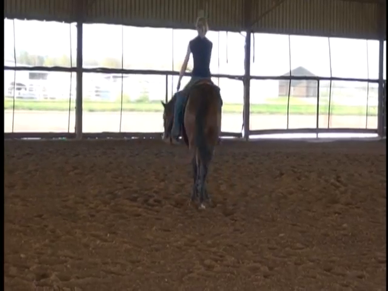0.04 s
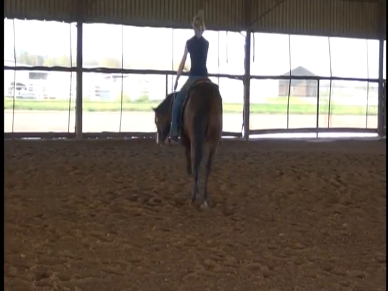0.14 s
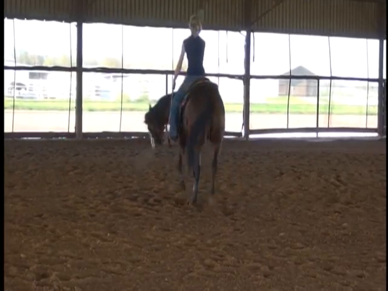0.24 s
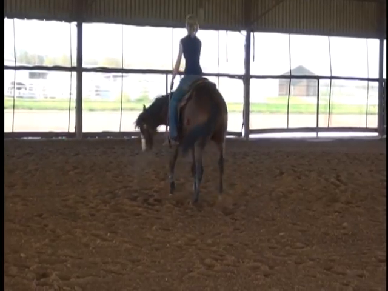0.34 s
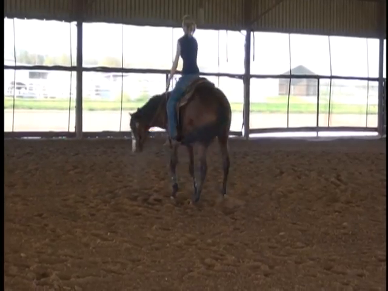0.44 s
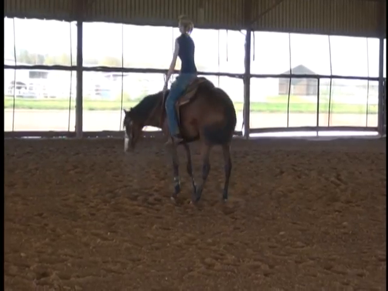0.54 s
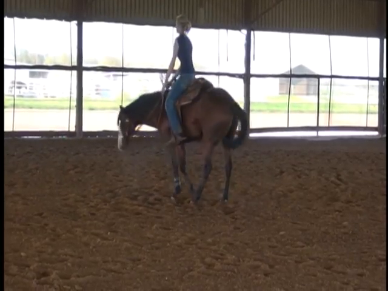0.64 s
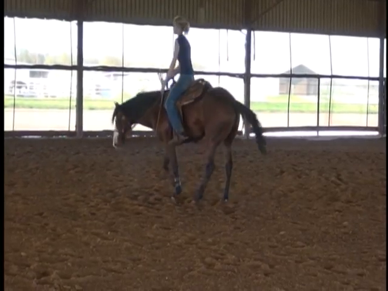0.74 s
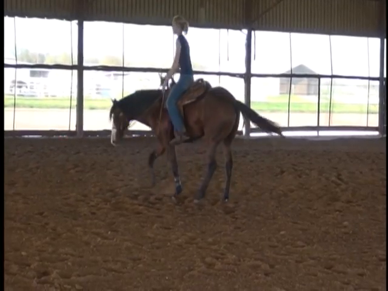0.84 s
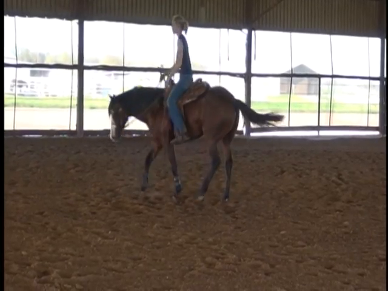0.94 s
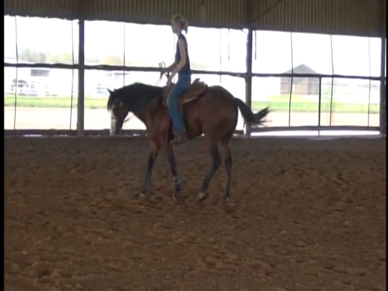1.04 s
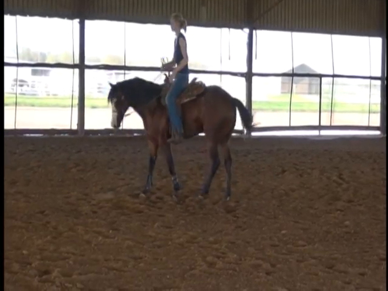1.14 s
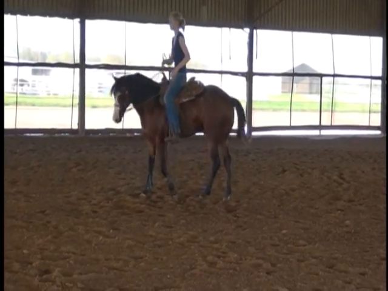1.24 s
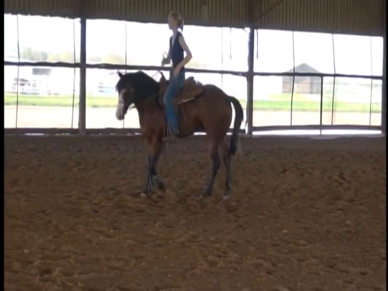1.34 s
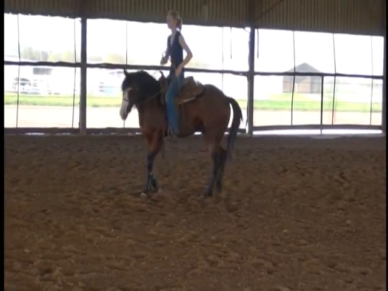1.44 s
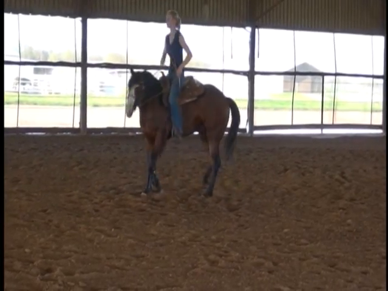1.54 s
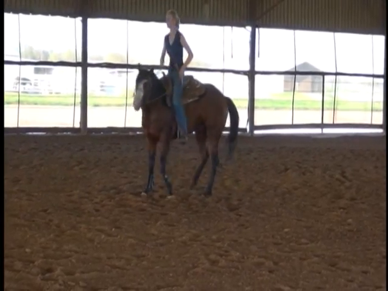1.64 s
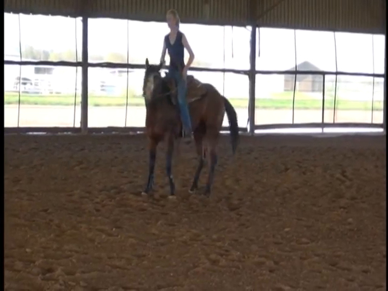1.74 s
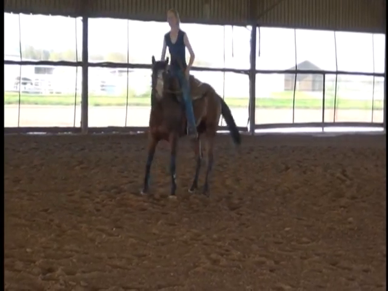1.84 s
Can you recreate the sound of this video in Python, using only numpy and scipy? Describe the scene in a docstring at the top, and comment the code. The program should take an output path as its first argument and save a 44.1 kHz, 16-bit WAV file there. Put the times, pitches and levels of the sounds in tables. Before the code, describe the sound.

A horse blows one loud, wet, fluttering snort in an indoor arena, bit clinking around it

```python
"""Indoor riding arena, horse close to two microphones, outdoor noise drifting in all through by the open side.
A soft step in dirt and a rub of tack, then the bit clinks and a dry hiss starts as the nostrils open.
The snort follows: two nostrils flap in turn, slowing as the air runs out; each flap thumps, snaps and puffs air
through the nose, wet drops spray and a few flaps smack. Then the horse walks on, bit and buckles clinking as
struck metal modes; small birds, gliding sine whistles, chirp faintly far off. A filtered-noise tail is the hall."""
import sys
import numpy as np
from scipy import signal
from scipy.fft import rfft, irfft, next_fast_len
from scipy.io import wavfile
from scipy.ndimage import uniform_filter1d

SR = 44100
rng = np.random.default_rng(int(sys.argv[2]) if len(sys.argv) > 2 else 0)


def store_pcm(level_fs):
    """Save levels as 16-bit WAV."""
    pcm = np.round(np.clip(level_fs, -1, 1) * 32767).astype(np.int16)
    wavfile.write(sys.argv[1], SR, np.atleast_2d(pcm).T)


N = 83790

# colour of the outdoor noise: freq_hz, level_db
OUTSIDE_COLOUR = [(25, -16), (40, -31), (60, 2.5), (80, -3.5), (115, 0.5), (165, 1.5), (240, -7), (400, -8),
                  (600, -3.5), (950, 0), (1250, -1.5), (1800, -6), (2500, -14), (4200, -22), (6300, -25),
                  (8000, -31), (10000, -33), (12000, -31.5), (15000, -30)]
# left-right difference of the outdoor noise, relative to the sum: freq_hz, level_db
OUTSIDE_SIDE = [(60, -63), (200, -63), (380, -24.5), (700, -16), (1290, -12), (4400, -8.5), (8120, -6.5),
                (15000, -13)]
OUTSIDE_DB, OUTSIDE_WAVER_DB = -58.5, .6

# far bird chirps: start_s, length_s, start_hz, middle_hz, end_hz, level_db
CHIRPS = [(1.038, .048, 3750, 4100, 3000, -67), (1.108, .038, 3400, 3020, 3300, -71),
          (1.152, .034, 3500, 3600, 3300, -72), (1.715, .065, 6550, 6250, 6000, -72),
          (1.772, .026, 4100, 3980, 3800, -69), (1.78, .065, 5400, 5340, 5400, -75),
          (1.797, .02, 3450, 3500, 3400, -65), (1.82, .036, 2650, 3100, 4000, -69),
          (1.84, .075, 5380, 5450, 5400, -72), (1.848, .034, 3950, 4500, 4450, -66),
          (1.877, .027, 3900, 3600, 2950, -64)]
BIRD_WAVER = .022  # rms share of the pitch
BIRD_ROOM_DB = -3  # what the birds send to the hall

# reverberation time of the arena by pitch: freq_hz, t60_s
ARENA_T60 = [(100, 0.22), (300, 1.53), (1000, 0.75), (3000, 0.75), (8000, 0.44), (15000, 0.04)]
# left-right difference of the reverberation, relative to the sum: freq_hz, level_db
ARENA_SIDE = [(130, -73), (500, -27), (1000, -15.5), (2000, -13.5), (4000, -8.5), (8000, -10), (14000, -44)]
ARENA_DB, ARENA_BUILDUP_S = -4, .013

# hoof steps in soft dirt: start_s, level_db
STEPS = [(.045, -74), (.79, -71), (0.982, -61), (1.285, -66.5), (1.49, -64), (1.66, -66)]
# colour of a hoof step: freq_hz, level_db
HOOF_COLOUR = [(35, -20), (65, 11), (140, -14), (280, -25), (900, -10), (1600, 0), (3500, -36),
               (10000, -51)]
STEP_ATTACK_S, STEP_FADE_S = .02, .0053

# short rubs of the tack: start_s, level_db, fade_s
RUBS = [(0.083, -59.5, 0.0077), (1.719, -74, 0.12)]
# colour of a rub: freq_hz, level_db
RUB_COLOUR = [(2500, -42), (4500, 5), (6000, 12), (7400, -6), (9000, 5.5), (12000, -7), (15000, -20)]
# clinks of bit and buckles: start_s, level_db, brightest_hz, t60_s, breadth_octaves, contact_crack_db
CLINKS = [(.16, -45, 11500, .044, .6, -58), (.784, -55.5, 8700, .046, .33, -66),
          (.906, -54.5, 9100, .032, .1, -77), (1.1849, -40, 9500, .012, .7, -51),
          (1.663, -54, 11500, .028, .56, -65), (1.72, -57, 8850, .02, .24, -62)]
# modes of the metal: freq_hz, level_db
METAL_MODES = [(4750, -7), (6020, -4), (6557, -2), (9130, -3), (9320, -8), (11540, 0), (12090, -3),
               (12600, -6)]
# colour of the crack at metal contact: freq_hz, level_db
CRACK_COLOUR = [(2500, -29), (4500, -7), (6500, 7), (8000, -6), (10000, -12), (12000, 13), (13000, -22),
                (15500, -20)]
# a bit ring that swings free and sings: start_s, pitch_hz, level_db, t60_s
BIT_RINGS = [(.161, 11540, -58, .13), (.905, 11540, -75, .4), (1.829, 11540, -72, 1.5)]
CLINK_CONTACT_S, CRACK_FADE_S = .003, .0006

# loud wet smacks: centre_s, peak_db, half_length_s, centre_hz
SMACKS = [(.214, -32, .003, 2250), (.3095, -27, .002, 1500), (.32, -26, .0008, 1400),
          (.359, -26, .002, 1800), (.3853, -23, .001, 1900), (.452, -26, .0006, 850),
          (.4648, -23, .0006, 1350), (.525, -28, .0032, 1650), (.6172, -28, .0007, 1500)]
# broad colour of a smack: freq_hz, level_db
SMACK_COLOUR = [(100, -38), (400, -6), (900, 2.5), (2400, -1), (3300, -15), (6000, -21), (15000, -42)]
SMACK_WIDTH_HZ, SMACK_LIFT_DB = 2100, 16

# flutter of the nostrils: time_s, flaps_per_second
FLUTTER = [(.21, 41.2), (.32, 41.4), (.36, 39.2), (.43, 37.6), (.46, 37), (.51, 31.5), (.56, 32.8),
           (.63, 32.2), (.68, 26)]
FIRST_FLAP_S = .2135
# force of the blow: time_s, level_db
EFFORT = [(.16, -13), (.195, 5), (.212, -5), (.25, -3), (.3, -1.5), (.385, -1), (.425, -2), (.47, -0.5),
          (.53, -2.5), (.575, -2), (.617, -3.5), (.655, -8), (.72, -19), (.79, -35)]
# air that leaks between flaps: time_s, level_db
LEAK = [(.2, -14), (.27, -9), (.37, -9), (.5, -15), (.65, -12)]
# weight of the thump, relative to the blow: time_s, level_db
THUMP_WEIGHT = [(.2, -11), (.26, 3), (.35, -6), (.46, 2.5), (.54, -3.5), (.6, -11)]
# level of the wet spray: time_s, level_db
WETNESS = [(.18, -12), (.22, -7), (.29, -3), (.4, 0.5), (.5, 2), (.59, 3.5), (.645, -1.5), (.69, -9.5),
           (.715, -35)]
# colour of the air: freq_hz, level_db
AIR_COLOUR = [(90, -36.5), (220, -6.5), (400, -5.5), (620, -4), (780, -1.5), (1200, -3.5), (1700, -6),
              (2400, -5.5), (3200, -13.5), (5000, -19), (8000, -29.5), (12000, -27), (15000, -55)]
# colour of the snap: freq_hz, level_db
SNAP_COLOUR = [(100, -30.5), (300, -5.5), (600, -6.5), (900, -6.5), (1700, 3.5), (2500, -28), (3500, -29),
               (6000, -46), (9000, -62), (15000, -84)]
# colour of the thump: freq_hz, level_db
THUMP_COLOUR = [(40, -46), (85, -16), (115, 10.5), (160, -10), (200, -10.5), (250, 14.5), (320, -19),
                (600, -11.5), (1500, -23), (8000, -100)]
# colour of the wet spray: freq_hz, level_db
SPRAY_COLOUR = [(1500, -11), (3500, -4), (5100, -1.5), (6200, -8), (7500, -4.5), (8800, -0.5), (9800, -8),
                (12000, -5), (14000, -19), (16000, -1)]
# colour of the dry hiss as the nostrils first open: freq_hz, level_db
HISS_COLOUR = [(1000, -31), (2200, 14), (3500, 5), (4600, 3.5), (6000, -20), (12000, -29)]
# resonances of the nose: freq_hz, width_hz, lift_db
NOSE = [(249.8, 11, 13), (832, 43, 9), (997, 33, 6.5), (1064, 33, 3.5), (1174, 75, 11), (1493, 190, 5.5)]
# further resonances with the nostrils flared: freq_hz, width_hz, lift_db
FLARED = [(1642, 150, 3), (2050, 70, 2.5)]
# further resonances once the nostrils slacken: freq_hz, width_hz, lift_db
SLACK = [(610, 35, 5.7), (745, 76, 6), (2210, 89, 2.2)]
# low multiples of the flutter that the head radiates: multiple, level_db
DRONE = [(4, -50), (7, -52)]
AIR_DB, RATTLE_DB, HISS_DB = -40.5, -42, -49
SNAP_DB, THUMP_DB, SPRAY_DB = -50.5, -59, -55.5
SLACKEN_S, SLACKEN_OVER_S = .35, .074
HISS_S, HISS_RISE_S, HISS_FADE_S = .179, .041, .11
# timing of the flaps: scatter for each nostril, and the second's lag as a share of a cycle
JITTER_S, SECOND_JITTER_S, SECOND_LAG = .0005, .00159, .44
SECOND_DB, FLAP_SCATTER_DB = -4, .9
# puff flanks, each multiplied by the nostril's relative puff length
OPEN_S, SHUT_S = .0038, .0022
FIRST_OPEN, SECOND_OPEN = .86, 1
# the small puff as a nostril peels open ahead of each flap
PEEL_LEAD_S, PEEL_JITTER_S, PEEL_DB, PEEL_SCATTER_DB = .006, .0012, -3, 2
SPRAY_BETWEEN_DB = -3  # spray outside the puffs of the first, wetter nostril
SPRAY_LOW_HZ, SPRAY_HIGH_HZ, SPRAY_CYCLES = 2490, 14000, 3.6
RATTLE_LOW_HZ, RATTLE_HIGH_HZ, RATTLE_CYCLES = 850, 2700, 2.2
DROP_SCATTER_DB = 3

# microphones: left over right, top of the band, faint whine
LEFT_DB, TOP_HZ = .3, 15800
WHINE_HZ, WHINE_DB = 15734, -82


def undb(db):
    """Decibels to gain."""
    return 10 ** (np.asarray(db) / 20)


def curve(rows, at):
    """Straight lines between table rows."""
    return np.interp(at, *np.array(rows, float).T)


def over_hz(rows, hz):
    """A table read on a log-frequency axis."""
    freq, value = np.array(rows, float).T
    return np.interp(np.log(hz + 1), np.log(freq), value)


def unit(x):
    """Scale to rms 1."""
    return x / np.sqrt(np.mean(x ** 2) + 1e-30)


def noise():
    """White noise."""
    return rng.standard_normal(N)


def colour(x, rows, peaks=()):
    """Causal (minimum-phase) filter with a broad colour and narrow resonances."""
    size = 2 * next_fast_len(N)
    hz = np.fft.rfftfreq(size, 1 / SR)
    db = over_hz(rows, hz)
    for freq, width, lift in peaks:
        db = db + lift / (1 + (2 * (hz - freq) / width) ** 2)
    # folding the cepstrum forward in time makes the filter causal
    cepstrum = irfft(np.log(undb(db)))
    cepstrum[1:size // 2] *= 2
    cepstrum[size // 2 + 1:] = 0
    return irfft(rfft(x, size) * np.exp(rfft(cepstrum)))[:N]


def burst(t, start, attack, fade):
    """Envelope that rises linearly and dies away exponentially."""
    rise = np.clip((t - start) / attack, 0, 1)
    return rise * np.exp(-np.maximum(t - start - attack, 0) / fade)


def bell(x):
    """Smooth hump with its top at zero."""
    return np.exp(-np.minimum(x ** 2, 20))


def ring(t, start, hz, t60):
    """One struck mode: a sine losing 60 dB in t60 seconds."""
    age = np.maximum(t - start, 0)
    return np.sin(2 * np.pi * hz * age) * np.exp(-np.log(1000) * age / t60)


def spread(mid, side, rows):
    """Left and right for two close microphones: the bass is nearly shared, the treble differs more."""
    hz = np.fft.rfftfreq(N, 1 / SR)
    side = irfft(rfft(side) * undb(over_hz(rows, hz)), N)
    return np.array([mid + side, mid - side])


def outside(t):
    """Steady outdoor noise through the open side, its level wavering a little."""
    knots = np.linspace(0, t[-1], num=20)
    waver_db = OUTSIDE_WAVER_DB * np.interp(t, knots, rng.standard_normal(len(knots)))
    mid = unit(colour(noise(), OUTSIDE_COLOUR))
    side = unit(colour(noise(), OUTSIDE_COLOUR))
    return undb(OUTSIDE_DB + waver_db) * spread(mid, side, OUTSIDE_SIDE)


def birds(t):
    """Short faint whistles, each a sine on a curved glide of pitch with a slight waver."""
    out = 0
    waver = 1 + BIRD_WAVER * unit(uniform_filter1d(noise(), size=60))
    for start, length, first, middle, last, db in CHIRPS:
        along = np.clip((t - start) / length, 0, 1)
        glide = np.polyfit([0, .5, 1], [first, middle, last], 2)
        hz = np.polyval(glide, along) * waver
        out = out + undb(db) * np.sin(np.pi * along) * np.sin(2 * np.pi * np.cumsum(hz) / SR)
    return out


def arena(x, t):
    """Diffuse tail of the hall: noise whose bands each die at their own rate, the low mids last."""
    hz = np.fft.rfftfreq(N, 1 / SR)
    tails = []
    for _ in range(2):
        white, tail = rfft(noise()), 0
        for k, (_, t60) in enumerate(ARENA_T60):
            band = [(freq, j == k) for j, (freq, _) in enumerate(ARENA_T60)]
            band_noise = irfft(white * over_hz(band, hz), N)
            tail = tail + band_noise * burst(t, 0, ARENA_BUILDUP_S, t60 / np.log(1000))
        # level is set by the energy of the third band's decay
        tail /= np.linalg.norm(burst(t, 0, ARENA_BUILDUP_S, ARENA_T60[2][1] / np.log(1000)))
        tails.append(signal.fftconvolve(x, tail)[:N])
    return undb(ARENA_DB) * spread(*tails, ARENA_SIDE)


def hooves(t):
    """Soft low thuds with a scuff of dirt, from short bursts of coloured noise."""
    steps = sum(undb(db) * burst(t, start, STEP_ATTACK_S, STEP_FADE_S) for start, db in STEPS)
    return unit(colour(noise(), HOOF_COLOUR)) * steps


def tack(t):
    """Straps rub as noise; metal parts clink as struck modes with a crack at contact; a bit ring sings."""
    rubbing = sum(undb(db) * burst(t, start, .0066, fade) for start, db, fade in RUBS)
    out = rubbing * unit(colour(noise(), RUB_COLOUR))
    crack = unit(colour(noise(), CRACK_COLOUR))
    for start, db, brightest, t60, octaves, crack_db in CLINKS:
        modes = 0
        for hz, mode_db in METAL_MODES:
            # modes far from the brightest pitch are struck less
            share = np.exp(-(np.log2(hz / brightest) / octaves) ** 2 / 2)
            modes = modes + undb(mode_db) * share * ring(t, start, hz, t60)
        contact = np.clip((t - start) / CLINK_CONTACT_S, 0, 1)
        out = out + undb(db) * modes / np.max(np.abs(modes)) * contact
        out = out + undb(crack_db) * crack * burst(t, start, CLINK_CONTACT_S, CRACK_FADE_S)
    for start, hz, db, t60 in BIT_RINGS:
        out = out + undb(db) * ring(t, start, hz, t60)
    return out


def smacks(t):
    """Now and then a wet nostril sticks and bursts open: a brief hump of resonant noise."""
    out = 0
    for centre, db, half_length, hz in SMACKS:
        puff = noise() * bell((t - centre) / half_length)
        pop = colour(puff, SMACK_COLOUR, [(hz, SMACK_WIDTH_HZ, SMACK_LIFT_DB)])
        out = out + undb(db) * pop / np.max(np.abs(pop))
    return out


def drops(low_hz, high_hz, cycles, count):
    """Tiny bursts of mucus, each with its own moment, pitch and size, ringing a few cycles."""
    when, pitch, turn = rng.random((count, 3)).T[:, :, None]
    hz = low_hz + (high_hz - low_hz) * pitch
    age = np.arange(256)  # samples
    size = undb(DROP_SCATTER_DB * rng.standard_normal((count, 1)))
    rung = age / SR * hz / cycles
    envelope = size * rung * np.exp(-2 * rung) * np.sqrt(hz)
    waves = envelope * np.sin(2 * np.pi * (hz * age / SR + turn))
    places = (when * N).astype(int) + age
    return np.bincount(places.ravel(), waves.ravel(), N)[:N]


def flaps(t, cycles, lag, db, jitter, width):
    """One nostril: each flap peels open with a small puff, then blows a full one with a slap at its height."""
    slaps, puffs = np.zeros(N), np.zeros(N)
    for when in np.interp(np.arange(int(cycles[-1]) - 1) + lag, cycles, t):
        late, strong, early, peel = rng.standard_normal(4)
        when = when + jitter * late
        size = undb(db + FLAP_SCATTER_DB * strong)
        slaps[min(int(when * SR), N - 1)] += size
        peel_at = when - PEEL_LEAD_S + PEEL_JITTER_S * early
        peel_share = undb(PEEL_DB + PEEL_SCATTER_DB * peel)
        for at, share in ((when, 1), (peel_at, peel_share)):
            flank = np.maximum((at - t) / OPEN_S, (t - at) / SHUT_S) / width
            puffs += size * share * bell(flank)
    return slaps, puffs


def snort(t):
    """Two nostrils flap in turn, gating air and wet spray; each slap excites a snap and a thump."""
    cycles = np.cumsum(curve(FLUTTER, t)) / SR
    cycles -= np.interp(FIRST_FLAP_S, t, cycles)
    blowing = (t > EFFORT[0][0]) & (t < EFFORT[-1][0])
    force = undb(curve(EFFORT, t)) * blowing
    thump_force = force * undb(curve(THUMP_WEIGHT, t))
    wetness = undb(curve(WETNESS, t)) * blowing
    slack = np.clip((t - SLACKEN_S) / SLACKEN_OVER_S, 0, 1)

    first_slaps, puffs = flaps(t, cycles, 0, 0, JITTER_S, FIRST_OPEN)
    other_slaps, other_puffs = flaps(t, cycles, SECOND_LAG, SECOND_DB, SECOND_JITTER_S, SECOND_OPEN)
    slaps = first_slaps + other_slaps
    leak = undb(curve(LEAK, t))
    gate = unit(puffs + other_puffs + leak)
    wet_gate = unit(puffs + undb(SPRAY_BETWEEN_DB) * (other_puffs + leak))

    def voiced(source, drive, rows, peaks=()):
        """A source driven by the blow and filtered; rms 1 at full drive."""
        return colour(source * drive, rows, peaks) / np.std(colour(source, rows, peaks))

    def nasal(source, rows):
        """A source heard through the nose, whose resonances shift as the nostrils slacken."""
        flared = voiced(source, force * (1 - slack), rows, NOSE + FLARED)
        return flared + voiced(source, force * slack, rows, NOSE + SLACK)

    spray = drops(SPRAY_LOW_HZ, SPRAY_HIGH_HZ, SPRAY_CYCLES, count=7500)
    rattle = drops(RATTLE_LOW_HZ, RATTLE_HIGH_HZ, RATTLE_CYCLES, count=1200)
    drone = 0
    for multiple, db in DRONE:
        drone = drone + undb(db) * np.sin(2 * np.pi * (round(multiple) * cycles + rng.random()))
    opening = burst(t, HISS_S, HISS_RISE_S, HISS_FADE_S)

    out = undb(AIR_DB) * nasal(noise() * gate, AIR_COLOUR)
    out += undb(RATTLE_DB) * nasal(rattle * gate, AIR_COLOUR)
    out += undb(HISS_DB) * voiced(noise() * gate, opening, HISS_COLOUR)
    out += undb(SNAP_DB) * nasal(slaps, SNAP_COLOUR)
    out += undb(THUMP_DB) * voiced(slaps, thump_force, THUMP_COLOUR)
    out += drone * thump_force
    out += undb(SPRAY_DB) * voiced(spray * wet_gate, wetness, SPRAY_COLOUR)
    return out


def scene():
    """Horse close and centred, birds faint, both with the hall's tail over the outdoor noise."""
    t = np.arange(N) / SR
    horse = snort(t) + smacks(t) + tack(t) + hooves(t)
    chirps = birds(t)
    hall = arena(horse + undb(BIRD_ROOM_DB) * chirps, t)
    balance = undb(np.array([[LEFT_DB], [-LEFT_DB]]) / 2)
    return (horse + chirps + hall + outside(t)) * balance


def record(dry):
    """The recorder adds a faint high whine and cuts the top steeply."""
    whine = undb(WHINE_DB) * np.sin(2 * np.pi * WHINE_HZ * np.arange(N) / SR)
    top_cut = signal.ellip(10, .2, 70, TOP_HZ, fs=SR, output="sos")
    return signal.sosfilt(top_cut, dry + whine)


dry = scene()
out = record(dry)
store_pcm(out)
```